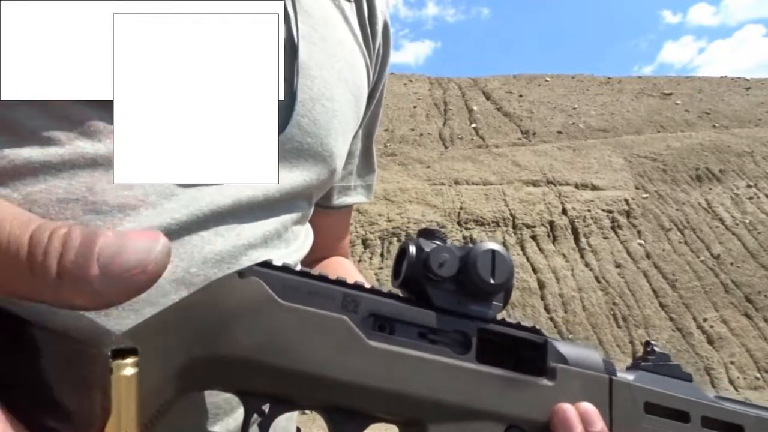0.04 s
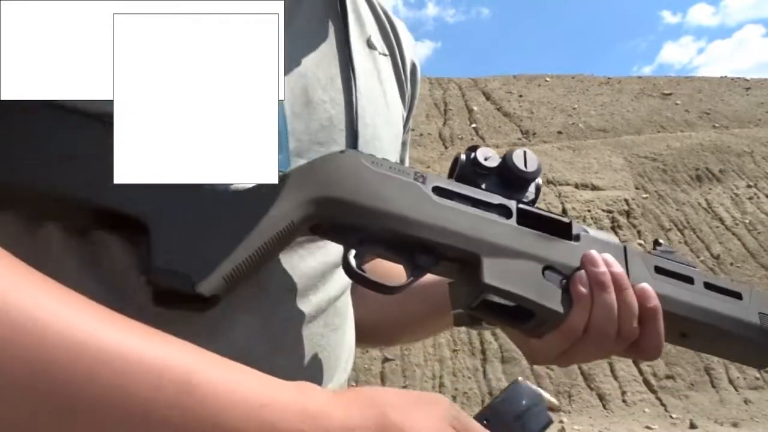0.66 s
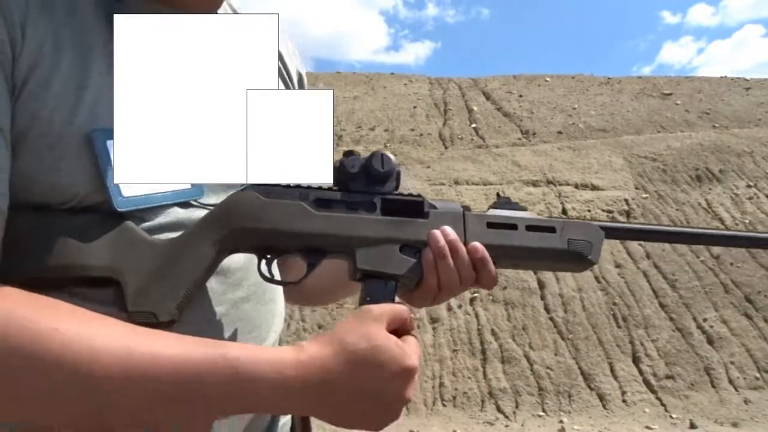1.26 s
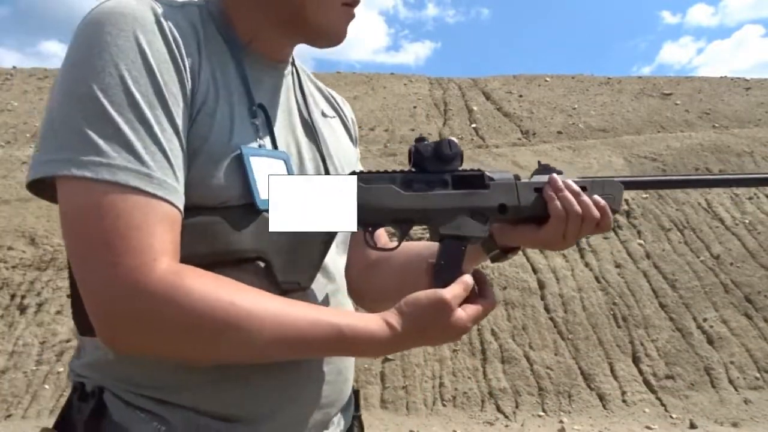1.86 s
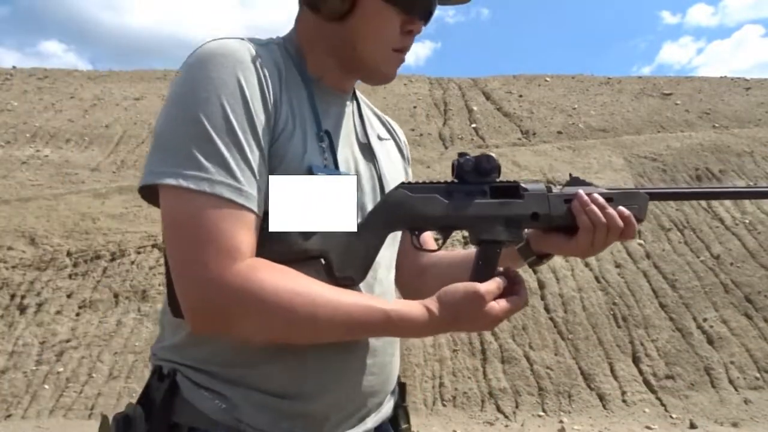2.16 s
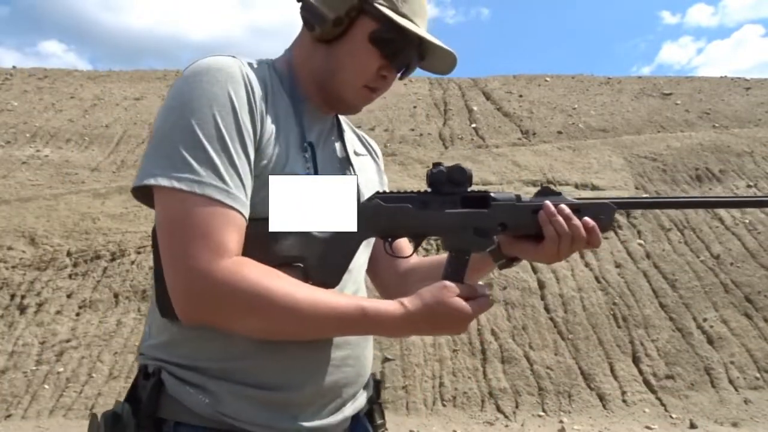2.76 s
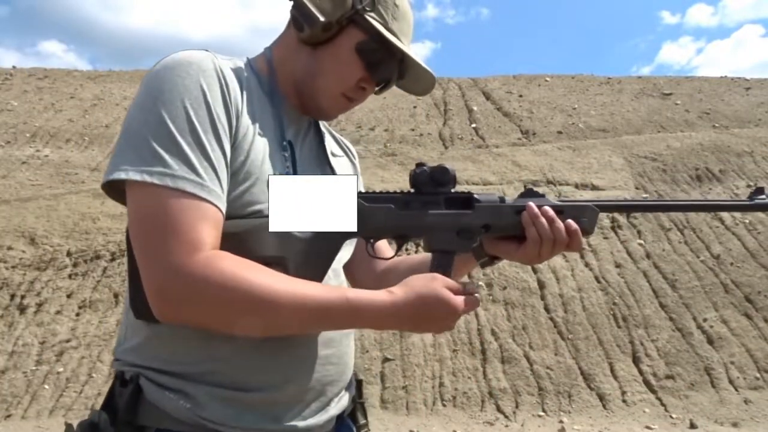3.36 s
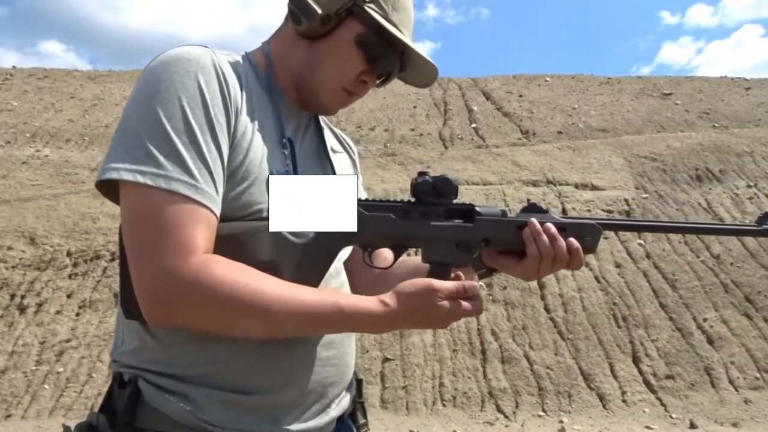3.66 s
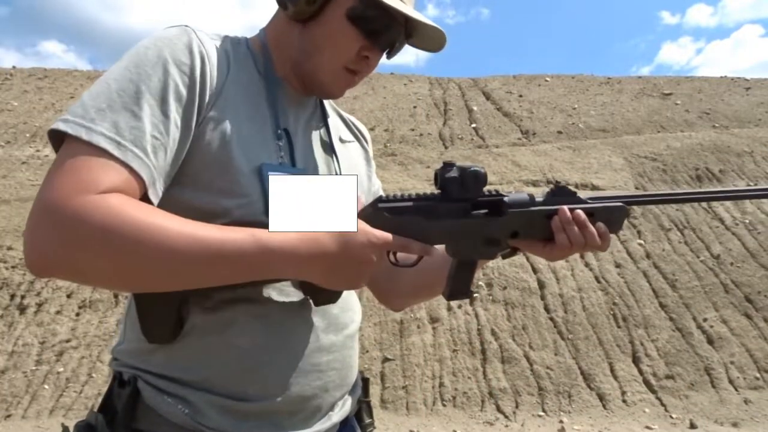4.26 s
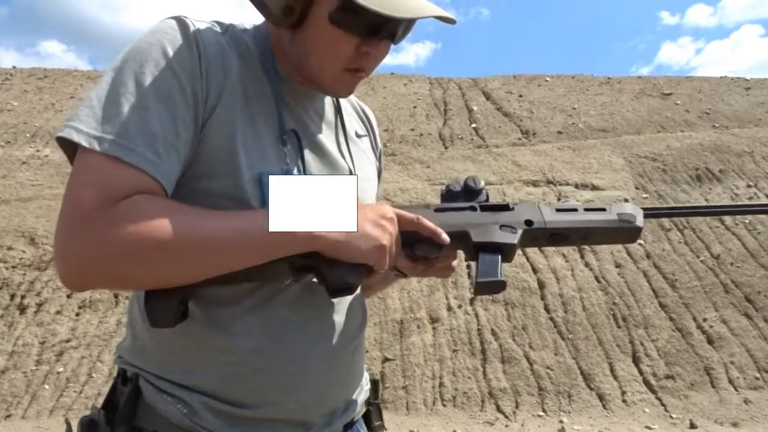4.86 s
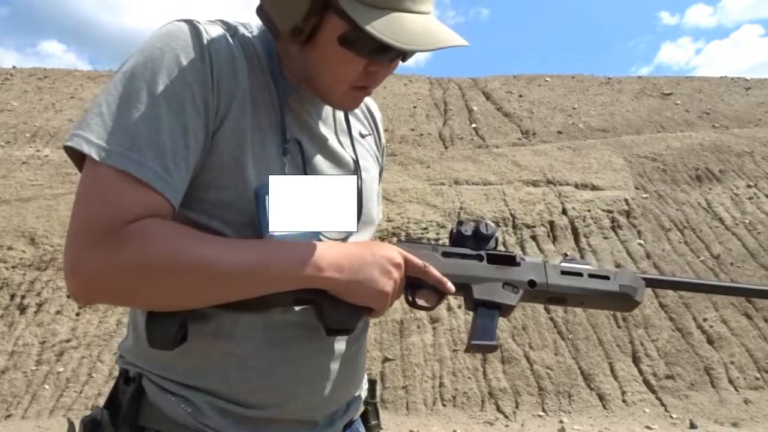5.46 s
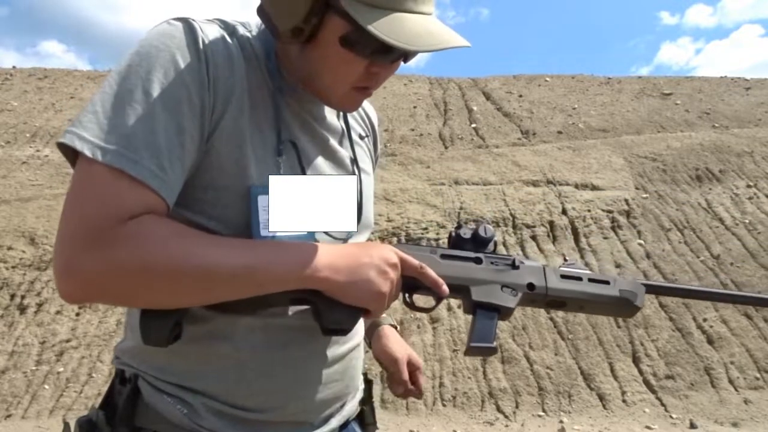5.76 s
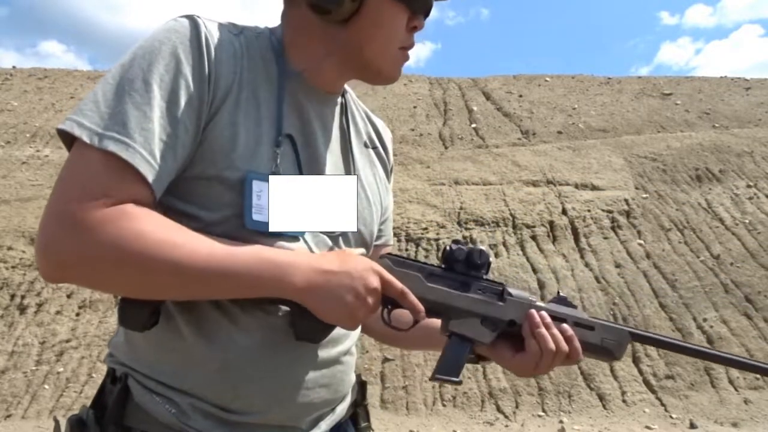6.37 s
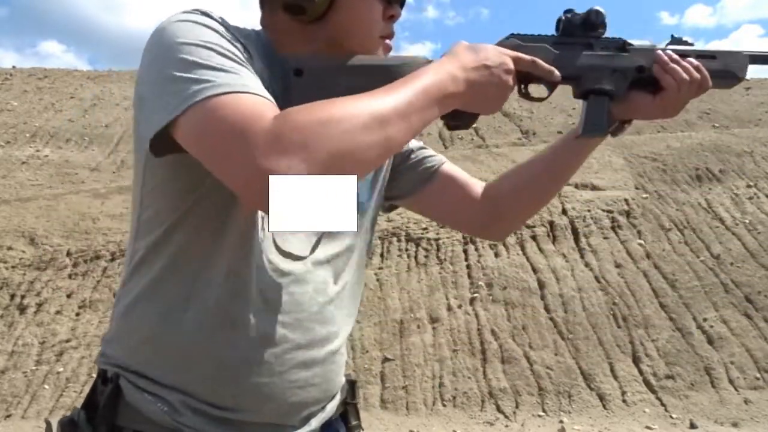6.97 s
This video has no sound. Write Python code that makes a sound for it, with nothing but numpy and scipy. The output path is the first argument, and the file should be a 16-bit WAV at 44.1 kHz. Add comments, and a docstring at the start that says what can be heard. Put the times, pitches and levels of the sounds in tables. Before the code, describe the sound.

Wind thumps softly on the microphone as a brass cartridge slides into a magazine and snaps in with a small ring at about 0.3 seconds. At 1 second the magazine meets a carbine with a quick cluster of sharp, close clacks, then ticks and scrapes loosely until 1.8, while the wind buffets are strongest. A single sharp knock comes at 2.7, and a run of clicks peaks in a bright latching snap at 3.5. The breeze dies down around here. Hands rub on the plastic stock, with a knock at 4.6 and a sharp click at 5.3. At about 5.7 the bolt slams shut, the loudest sound, with a brief steel ring and slight outdoor echo. Lighter knocks, rubbing and one small gust follow from 6.3 to 7. A faint airy hiss lies underneath, and distant small birds chirp faintly between 4.8 and 6.1.

```python
"""Wind thumps on the microphone as a brass cartridge slides into a pistol magazine and snaps under its lips.
The magazine is fumbled into a carbine and latches, the bolt slams shut and sets the steel ringing,
and the polymer stock knocks and rubs in the hands. The breeze dies down halfway through.
Behind it lies an open shooting range: airy hiss, small birds far off, a faint echo from an earth bank."""
import sys
import numpy as np
from scipy import signal
from scipy.fft import rfft, irfft
from scipy.io import wavfile

SR = 44100
rng = np.random.default_rng(int(sys.argv[2]) if len(sys.argv) > 2 else 0)


def store_pcm(level_fs):
    """Save levels as 16-bit WAV."""
    pcm = np.round(np.clip(level_fs, -1, 1) * 32767).astype(np.int16)
    wavfile.write(sys.argv[1], SR, np.atleast_2d(pcm).T)


N = 314124
TIME = np.arange(N) / SR
HIT_N = 8192  # samples in one blow
HIT_TIME = TIME[:HIT_N]


# Knocks of magazine, catch and stock: t/s, level/dB, ring f/Hz, treble send/dB, top send/dB
KNOCKS = [(1.004, -16, 2030, -14.5, -14), (1.029, -21, 1810, -16, -25), (1.058, -13, 1830, -17.5, -29),
          (1.069, -34, 1780, -31, -41), (1.184, -23.5, 1890, -18, -21.5), (1.262, -33, 810, -32, -44),
          (1.309, -38, 1650, -31, -35), (1.379, -41, 5000, -4, -14.5), (1.455, -33.5, 1960, -17, -45),
          (1.68, -24.5, 2030, -44, -35), (1.784, -40, 2680, 5, -19), (2.445, -38, 2190, -17.5, -42),
          (2.654, -16.5, 2154, -21, -35.5), (3.18, -45.5, 2630, -12.5, -15), (3.272, -44, 2040, -7, -20),
          (3.291, -37, 1750, -9.5, -30), (3.383, -27.5, 2250, -14.5, -32.5), (3.4, -37.5, 1520, -27, -42),
          (3.496, -17, 2160, -5, -12), (3.512, -35, 2330, -2, -19), (3.553, -32.5, 1980, -9, -16.5),
          (3.877, -43.5, 2130, -30, -34), (4.095, -42, 2000, -32, -41), (4.306, -40.5, 2200, -13.5, -49),
          (4.324, -38, 1260, -25, -45), (4.482, -48.5, 3200, -5, -27), (4.595, -25.5, 2130, -12.5, -46),
          (5.28, -33, 2460, -10.5, -36), (5.335, -16, 2650, -7, -20.5), (5.369, -28, 2800, -11, -31),
          (5.376, -27.5, 3050, -12.5, -24.5), (5.606, -46, 2710, -25.5, -37),
          (6.277, -37.5, 1370, -12.5, -42), (6.284, -32, 2200, -20, -45), (6.3, -18.5, 1744, -34, -61),
          (6.34, -26.5, 1570, -24, -49), (6.363, -42, 1530, -27, -39), (6.754, -31, 1210, -23, -34),
          (6.863, -47.5, 1900, -8.5, -25), (6.97, -38.5, 2030, -27, -39)]
# Modes of the hollow polymer stock, set off by every knock: f/Hz, level/dB, t60/s
STOCK_MODES = [(1175, -9, 0.058), (1463, -4, .035), (2120, -0.5, 0.03), (3580, -1, 0.012),
               (5940, -12.5, 0.023)]
# Pan of the knocks as the microphone moves about the gun: t/s, left minus right/dB
KNOCK_PAN = [(1, -.3), (2.6, -2.7), (3.5, -1.5), (4.6, -3.2), (5.3, -2), (6.3, -3), (6.75, 1)]


def gun_knocks(body_t60=.012, grit_t60=.039, bright_t60=.016):
    """Each knock is a light touch, a gritty contact and a short ring; the highs die first."""
    out = np.zeros((2, N))
    for s, db, hz, treble_db, top_db in list(KNOCKS) + loose_ticks():
        dull_db = -22.5 + .37 * (-22 - db)  # the lighter the knock, the more of it is dull contact
        noise = stereo_noise(HIT_N, .85)
        grit = noise * decay(grit_t60, .00034)
        bright = noise * decay(bright_t60, .00022)
        body = amp(-9) * band(thock(hz, body_t60), 640, 7000)
        dull = amp(dull_db - .5) * punch(band(grit, 1010, 1524))
        mids = amp(-18) * punch(band(grit, 1400, 3300))
        stock = amp(dull_db + 1) * punch(band(ring(STOCK_MODES)[:HIT_N], 800, 9000))
        treble = amp(treble_db - 1) * punch(band(bright, 2950, 6000))
        top = amp(top_db - 1) * punch(band(bright, 6500, 10500) + amp(-6) * band(bright, 10500, 16500))
        blow = body + dull + mids + stock + treble + top
        add(out, s + .0006, amp(db) * blow * pan(np.interp(s, *np.transpose(KNOCK_PAN))))
        touch = punch(band(bright[::-1], 1300, 5200))  # channels swapped, just ahead of the blow
        add(out, s - .0015, amp(db - 24) * touch)
    return out


# Spells of working the magazine about in its well: start t/s, end t/s
FUMBLE_SPELLS = [(1.07, 1.8), (3.39, 3.6)]


def loose_ticks(per_s=10, level_db=-45.5, spread_db=3.5, ring_hz=1610, spread_octaves=.69):
    """The loose magazine ticks unevenly in its well; gives rows like those of KNOCKS."""
    treble_db, top_db = -11.5, -18
    rows = []
    for start, end in FUMBLE_SPELLS:
        for k, (late, size, pitch) in enumerate(rng.uniform(-1, 1, (40, 3))):
            s = start + (k + .5 + late / 2) / per_s
            if s < end:
                hz = ring_hz * 2 ** (spread_octaves * pitch)
                rows.append((s, level_db + spread_db * size, hz, treble_db, top_db))
    return rows


def thock(hz, t60):
    """A struck part held in the hand sounds three heavily damped modes."""
    angle = 2 * np.pi * hz * HIT_TIME
    phase = rng.uniform(0, 2 * np.pi, 2)
    upper = amp(-10) * np.sin(1.401 * angle + phase[0])
    lower = amp(-13) * np.sin(.646 * angle + phase[1])
    return punch(decay(t60, .00014) * (np.sin(angle) + upper + lower))


# The bolt rattles forward, strips the round and hits home: t/s, level/dB, ring f/Hz, crash t60/s
BOLT_HITS = [(5.6372, -23, 2520, .025), (5.6418, -25, 2100, .02), (5.6466, -16.5, 2060, .045),
             (5.656, -14.5, 2300, .045), (5.664, -18.5, 1990, .012), (5.6671, -12, 2320, .05),
             (5.6730, -15.5, 2060, .035), (5.684, -13.5, 1886, .04), (5.6899, -14, 2244, .022)]
# EQ of the steel crash: f/Hz, level/dB
BOLT_EQ = [(60, -52), (250, -36), (500, -9), (750, -1), (1300, 4.5), (2100, 8.5), (3200, 5.5), (5000, 5),
           (7500, 3), (10000, -1), (11500, -12.5), (13500, -3.5), (16000, -14)]


def bolt_slam(crash_db=-7, body_db=-12):
    """A rush of steel impacts, each a noisy crash of dense modes over a shorter thock."""
    crash, body = np.zeros((2, 2, N))
    for s, db, hz, t60 in BOLT_HITS:
        add(crash, s, amp(db) * punch(stereo_noise(HIT_N, .94) * decay(t60, .00063)))
        add(body, s, amp(db) * thock(hz, t60 / 2))
    return (amp(crash_db) * eq(crash, BOLT_EQ) + amp(body_db) * band(body, 550, 9000)) * pan(-2)


# Modes of receiver and barrel: f/Hz, level/dB, t60/s
STEEL_MODES = [(1342, -9, 0.27), (1936, 0, 0.081), (2210, -4, 0.067), (2630, -4.5, .05), (3643, -6.5, .06),
               (4796, -11.5, 0.09), (5380, -11.5, 0.12), (6900, -6, .07), (7760, -10, .12),
               (8500, -7.5, .1), (9850, -4, 0.037), (13840, -13, .12), (15680, -14.5, .08)]


def steel_ring(blows, send_db):
    """The barrel and receiver ring on after each blow."""
    tone = np.array([ring(STEEL_MODES), ring(STEEL_MODES)])
    tone = tone + .57 * tone[::-1]  # crossfeed narrows the image
    return amp(send_db) * signal.fftconvolve(blows, tone / np.linalg.norm(tone[0]), axes=1)[:, :N]


# Thumb pushing the round along the magazine lips: t/s, level/dB
THUMB_PUSH = [(.145, -73), (.165, -60), (.2, -63), (.26, -64.5), (.29, -61), (.315, -53.5), (.34, -53),
              (.35, -78)]
# Modes of the brass case, the lips and the spring: f/Hz, level/dB, t60/s
BRASS_MODES = [(1030, -18, .9), (2530, 8, 0.069), (2880, -28.5, .6), (2880, 3, 0.054), (3540, 9.5, 0.014),
               (3960, 10, .018), (4230, -13, 0.021), (4850, 14, 0.0076), (5200, 6, 0.02), (7920, -41, .025)]


def cartridge(snap_s=.3447, ring_db=-23, tick_db=-31):
    """Brass sings as it slides under the magazine lips, then snaps into place and rings."""
    grit = stereo_noise(N, .67) * amp(1.8 * wander(53))
    sing = unit(band(grit, 4800, 5550))
    sing += amp(-8.5) * unit(band(grit, 2600, 2740)) + amp(-10) * unit(band(grit, 3700, 4500))
    hiss = unit(band(grit, 2800, 9100))
    sliding = (TIME > THUMB_PUSH[0][0]) & (TIME < snap_s)
    out = fader(THUMB_PUSH) * unit(amp(-3) * sing + amp(-3.5) * hiss) * sliding
    brass = punch(band(ring(BRASS_MODES), 2000, 12000))  # small parts radiate no bass
    add(out, snap_s, amp(ring_db) * brass * pan(1))
    tick = stereo_noise(HIT_N, .08) * decay(.068, .00061)
    add(out, snap_s, amp(tick_db) * punch(band(tick, 2170, 5400)))
    return out


# Fader ride for magazine, hands and sleeve rubbing along the gun: t/s, level/dB
RUB_RIDE = [(.33, -73), (.42, -63.5), (.6, -65), (1.2, -63), (1.78, -60.5), (1.94, -66), (2.35, -72),
            (3.15, -72.5), (3.45, -61), (3.8, -75), (4.02, -62.5), (4.38, -66.5), (4.58, -57.5), (4.9, -71),
            (6.65, -74), (6.86, -62), (7.12, -70)]
# EQ of the friction: f/Hz, level/dB
RUB_EQ = [(200, -36.5), (600, -14.5), (1100, -3), (2100, 3), (3000, 1.5), (4200, -5), (5600, -4),
          (7500, -14), (11000, -19.5), (16000, -28)]
# Scrapes of magazine in well and hand on stock: t/s, length/s, level/dB, resonance f/Hz
SCRAPE_STROKES = [(0.747, 0.096, -66, 2930), (1.033, 0.032, -55, 1950), (1.186, 0.055, -48.5, 1870),
                  (1.613, 0.12, -52.5, 5370), (1.759, 0.071, -51.5, 2800), (2.442, 0.078, -60.5, 3240),
                  (3.49, 0.047, -50, 2570), (3.975, 0.14, -66, 1940), (4.195, 0.071, -58, 2160),
                  (4.453, 0.13, -60, 5000), (5.603, 0.061, -57.5, 2580), (6.237, 0.045, -66.5, 2200)]


def rubbing(trim_db=-.5, resonance_db=-3.5, catches_per_s=35):
    """Grainy friction of polymer, skin and cloth; each scrape brings out one resonance."""
    catches = (rng.random(N) < catches_per_s / SR) * rng.uniform(-.93, 1, N)  # edges catch and slip
    grain = stereo_noise(N, .46) * amp(1.5 * wander(300))
    friction = unit(eq(grain + amp(24) * catches, RUB_EQ))
    out = fader(RUB_RIDE) * amp(trim_db) * friction
    for s, length, db, hz in SCRAPE_STROKES:
        stroke = friction[:, round(s * SR):][:, :round(length * SR)]
        resonance = unit(band(stroke, hz / 1.25, hz * 1.25))
        stroke = unit(unit(stroke) + amp(resonance_db) * resonance)
        add(out, s, amp(db) * stroke * signal.windows.tukey(stroke.shape[1], .7))
    return out * pan(-2)


# EQ of wind on the microphone: f/Hz, level/dB
WIND_EQ = [(20, -50), (50, -21.5), (100, -9), (170, -4), (300, -3), (420, -10.5), (600, -14.5), (900, -30),
           (2000, -55.5), (6000, -66.5)]
# Eddies cross the right port first: f/Hz, left minus right phase/rad
PORT_PHASE = [(20, -.1), (70, -.4), (150, -.85), (300, -1.3), (700, -1.4)]


def wind(rumble_db=-6, pop_db=-5.5, pops_per_s=150):
    """Eddies hit the microphone as a lumpy rumble full of soft pops, the strongest as single puffs."""
    strength = breeze()
    pops = unit((rng.random(N) < pops_per_s / SR) * rng.choice([-1, 1], N) * rng.uniform(.3, 1, N))
    rumble = unit(stereo_noise(N, .7) * amp(6 * np.minimum(wander(57), 1.5)))
    bed = amp(rumble_db) * unit(eq(rumble, WIND_EQ)) + amp(pop_db) * unit(eq(pops, WIND_EQ))
    out = strength * bed + buffets(strength)
    shift = np.exp(1j * at_hz(PORT_PHASE, np.fft.rfftfreq(N, 1 / SR)) / 2)
    return irfft(rfft(out) * np.array([shift, shift.conj()]), N) * pan(.8)


# The sharpest wind buffets: t/s, level/dB
SHARP_BUFFETS = [(.1, -34), (.135, -33.5), (.274, -31), (.323, -36), (.812, -31), (.934, -24),
                 (1.138, -27.5), (1.282, -24.5), (1.365, -27.5), (1.486, -35.5), (1.676, -27), (1.919, -35),
                 (2.018, -31), (2.137, -34.5), (2.66, -33.5), (2.733, -36), (2.877, -40.5), (3.178, -39.5),
                 (3.936, -48.5), (5.064, -47.5), (5.307, -45), (6.137, -59.5), (6.447, -43), (6.504, -40)]


def buffets(strength, trim_db=-1, lesser_per_s=14, over_wind_db=14, spread_db=3.5):
    """Single eddies thump the microphone: the sharp ones on cue, lesser ones growing with the wind."""
    phases = rng.random(500)
    late, size = rng.random((400, 2)).T
    times = (np.arange(len(late)) + late) / lesser_per_s
    wind_db = 20 * np.log10(np.interp(times, TIME, strength))
    levels = wind_db + over_wind_db + spread_db * (2 * size - 1)
    lesser = [(s, db) for s, db in zip(times, levels) if s < TIME[-1]]
    out = np.zeros((2, N))
    for (s, db), phase in zip(list(SHARP_BUFFETS) + lesser, phases):
        add(out, s - TIME[512], amp(trim_db) * band(puff(db, phase), 55, 3000))
    return out


def puff(db, phase, ref_hz=312, ref_db=-27.5, db_per_octave=38, width_cycles=.39):
    """One eddy: about one swing of pressure, with a steeper edge in its middle."""
    hz = ref_hz * 2 ** ((db - ref_db) / db_per_octave)  # a stronger eddy passes faster
    cycles = (TIME[:1024] - TIME[512]) * hz
    swing, edge = (np.exp(-(u / width_cycles) ** 2 / 2) * np.cos(2 * np.pi * (u + phase))
                   for u in (cycles, 1.9 * cycles))
    return amp(db) * (swing + amp(-14.5) * edge)


# Fader ride for the breeze, which dies down halfway: t/s, level/dB
BREEZE_RIDE = [(0, -63.5), (.46, -63), (.56, -53.5), (.88, -50), (1.02, -51), (1.1, -41.5), (1.56, -49.5),
               (1.78, -42), (2.08, -63.5), (2.37, -56.5), (3.05, -56), (3.25, -75.5), (3.62, -69.5),
               (4.1, -74), (4.25, -90), (5.3, -86.5), (6.05, -103), (7.12, -83.5)]
# Gusts on top of it: peak t/s, length/s, level/dB
GUST_SWELLS = [(.09, 0.21, -47), (.29, 0.28, -50), (2.65, 0.21, -56.5), (4.76, 0.21, -82),
               (5.02, 0.074, -68), (5.35, 0.3, -66.5), (6.46, 0.22, -54.5), (6.68, 0.43, -66.5)]


def breeze(swell_s=.053, swell_db=-15):
    """Wind strength as a gain, with a smooth swell for each gust and under each sharp buffet."""
    swells = list(GUST_SWELLS) + [(s, swell_s, db + swell_db) for s, db in SHARP_BUFFETS]
    strength = fader(BREEZE_RIDE)
    for s, length, db in swells:
        strength += amp(db) * np.cos(np.pi * np.clip((TIME - s) / length, -.5, .5)) ** 2
    return strength


# Reverb tail from the ground and the bank: f/Hz, t60/s
TAIL_DECAY = [(300, .3), (1200, .4), (3000, .39), (8000, .4), (16000, .36)]


def range_echo(gun, near_db=-19, tail_db=-23.5, bank_db=-45, bank_s=.195):
    """Quick scatter from body and ground, a thin open-air tail and a slap off the earth bank."""
    near = stereo_noise(HIT_N, .5) * decay(.032, .004)
    hz, t, spectrum = signal.stft(stereo_noise(SR, .1), SR, nperseg=256)
    fade = amp(-60 * t / at_hz(TAIL_DECAY, hz)[:, None])
    tail = signal.istft(spectrum * fade, SR, nperseg=256)[1]
    bank = stereo_noise(HIT_N, .37) * decay(.013, .002)
    response = np.zeros((2, SR))
    for s, db, part in [(.002, near_db, near), (.01, tail_db, tail), (bank_s, bank_db, bank)]:
        add(response, s, amp(db) * part / np.linalg.norm(part[0]))
    return signal.fftconvolve(gun, response, axes=1)[:, :N]


# Distant bird calls: t/s, length/s, start f/Hz, end f/Hz, level/dB
BIRD_CALLS = [(4.761, 0.066, 4700, 4980, -62.5), (4.863, .05, 4500, 4350, -66),
              (5.024, 0.055, 5300, 5450, -72), (5.11, 0.065, 4580, 4270, -65),
              (5.176, 0.087, 5360, 6400, -66), (5.804, 0.083, 5050, 4950, -64.5),
              (5.98, .06, 4440, 4750, -64.5), (6.06, 0.065, 4540, 4250, -68)]


def birds(trim_db=-3):
    """Small birds far off: short gliding whistles with a flutter in pitch."""
    out = np.zeros((2, N))
    for s, length, start_hz, end_hz, db in BIRD_CALLS:
        size = round(length * SR)
        hz = np.linspace(start_hz, end_hz, size) * (1 + .035 * wander(300)[:size])
        add(out, s, amp(db + trim_db) * np.hanning(size) * np.sin(2 * np.pi * np.cumsum(hz) / SR))
    return out


# EQ of the open-air bed: f/Hz, level/dB
AIR_EQ = [(20, -31.5), (100, -16), (250, -16), (500, -1.5), (850, 1.5), (1400, -4.5), (2800, -8),
          (4600, -6), (6500, -9), (11000, -14.5), (16000, -19.5)]


def open_air(hiss_db=-69, whine_db=-93, whine_hz=11025):
    """A gently wavering distant hiss and a thin steady whine."""
    hiss = unit(eq(stereo_noise(N, .05), AIR_EQ)) * amp(.5 * wander(3))
    return amp(hiss_db) * hiss + amp(whine_db) * np.sin(2 * np.pi * whine_hz * TIME)


def amp(db):
    """Decibels to gain."""
    return 10 ** (np.asarray(db) / 20)


def pan(db):
    """Stereo gains for a left minus right level."""
    return amp([[db / 2], [-db / 2]])


def unit(x):
    """Scales to rms 1."""
    return x / np.sqrt(np.mean(x ** 2) + 1e-20)


def fader(rows):
    """Turns a ride of t/s, level/dB into a gain for every sample."""
    return amp(np.interp(TIME, *np.transpose(rows)))


def at_hz(points, hz):
    """Reads a curve on a log-frequency axis."""
    f, value = np.transpose(points)
    return np.interp(np.log(hz + 1), np.log(f + 1), value)


def eq(x, points):
    """Shapes a sound with a curve of f/Hz, level/dB."""
    return irfft(rfft(x) * amp(at_hz(points, np.fft.rfftfreq(x.shape[-1], 1 / SR))), x.shape[-1])


def band(x, low_hz, high_hz):
    """Causal band-pass."""
    return signal.sosfilt(signal.butter(3, [low_hz, high_hz], "band", fs=SR, output="sos"), x)


def stereo_noise(size, correlation):
    """Left and right noise with a shared part."""
    noise = rng.standard_normal((3, size))
    return np.sqrt(correlation) * noise[0] + np.sqrt(1 - correlation) * noise[1:]


def wander(hz):
    """Smooth random motion of rms 1, rolling off above hz."""
    rolloff = np.exp(-(np.fft.rfftfreq(N, 1 / SR) / hz) ** 2)
    return unit(irfft(rfft(rng.standard_normal(N)) * rolloff, N))


def add(mix, s, sound):
    """Lays a sound into the mix at s seconds."""
    part = mix[:, max(round(s * SR), 0):][:, :sound.shape[-1]]
    part += sound[..., :part.shape[1]]


def decay(t60, rise_s):
    """Envelope of a blow: fast attack, exponential fall."""
    return amp(-60 * HIT_TIME / t60) * (1 - np.exp(-HIT_TIME / rise_s))


def punch(x, span_s=.0044):
    """Scales a blow so that its energy equals rms 1 held for the span."""
    return unit(x) * np.sqrt(span_s * SR / x.shape[-1])


def ring(modes):
    """Sum of dying sine modes at random phases."""
    t = TIME[:SR // 2]
    return sum(amp(db - 60 * t / t60) * np.sin(2 * np.pi * (hz * t + rng.random()))
               for hz, db, t60 in modes)


def scene(left_lag_s=1.3e-5):
    """Carbine and cartridge up front with their echo, then wind, open air and birds."""
    knocks, slam = gun_knocks(), bolt_slam()
    gun = knocks + steel_ring(knocks, send_db=-43) + slam + steel_ring(slam, send_db=-20) + rubbing()
    # the carbine is a little to the right, so it reaches the left port later
    delay = np.exp(-2j * np.pi * np.fft.rfftfreq(N, 1 / SR) * left_lag_s)
    gun[0] = irfft(rfft(gun[0]) * delay, N)
    gun += cartridge()
    return gun + range_echo(gun) + wind() + open_air() + birds()


def record(dry):
    """A soft clip rounds off the highest peaks, then a steep low-pass trims the top."""
    ceiling, cutoff_hz = .43, 16300
    rounded = dry / (1 + (dry / ceiling) ** 4) ** (1 / 4)
    lowpass = signal.firwin(511, cutoff_hz, window=("kaiser", 9), fs=SR)
    return signal.oaconvolve(rounded, lowpass[None], "same")


dry = scene()
out = record(dry)
store_pcm(out)
```